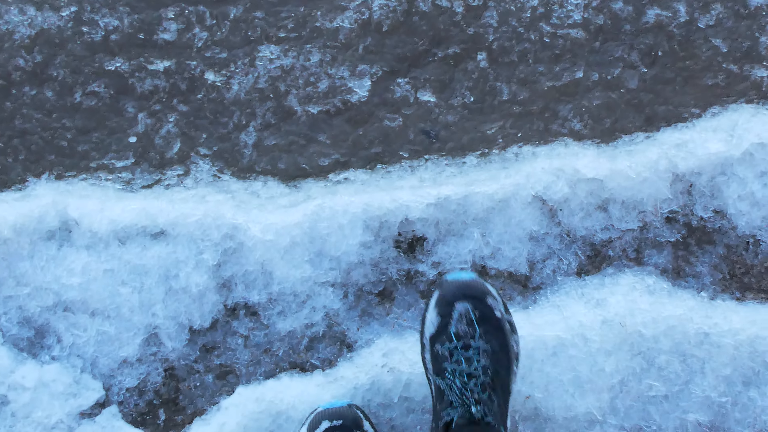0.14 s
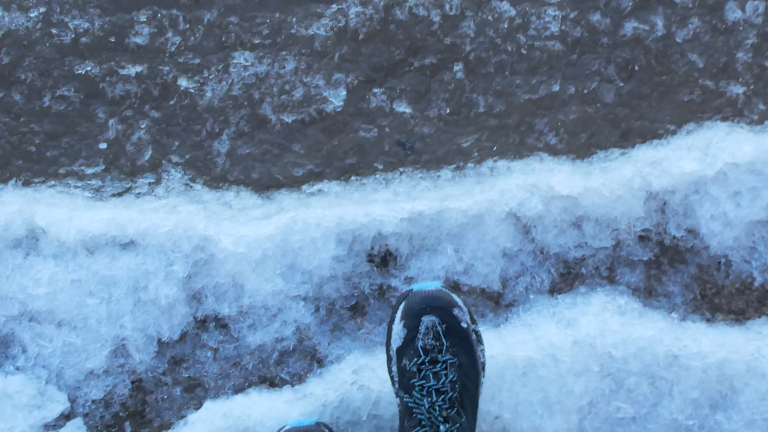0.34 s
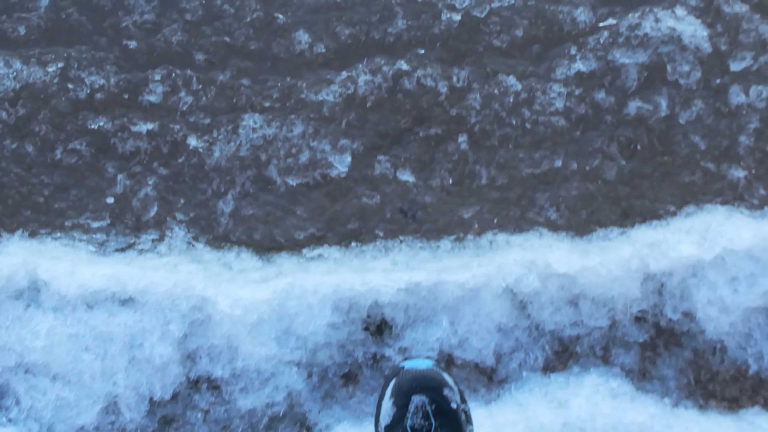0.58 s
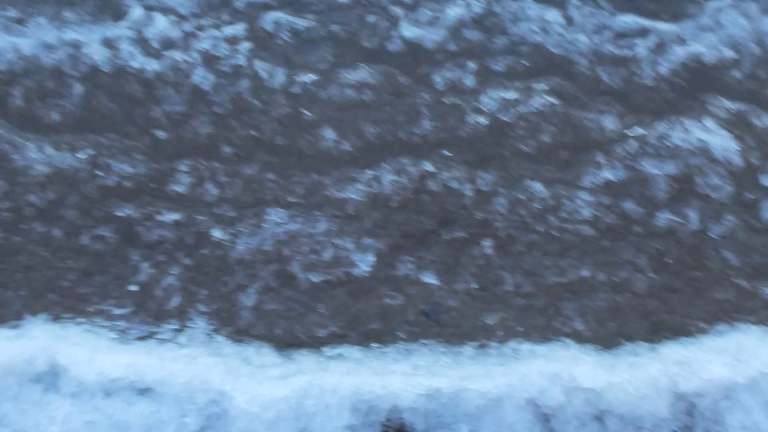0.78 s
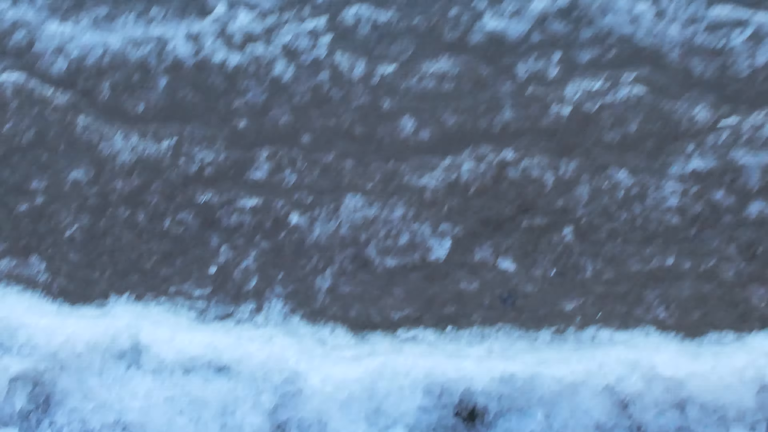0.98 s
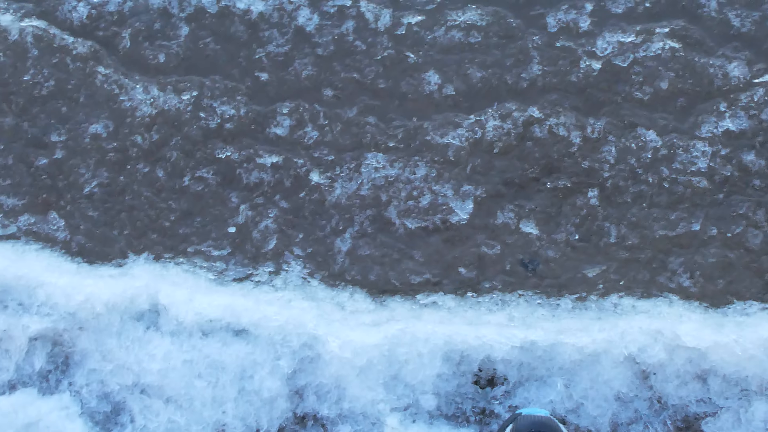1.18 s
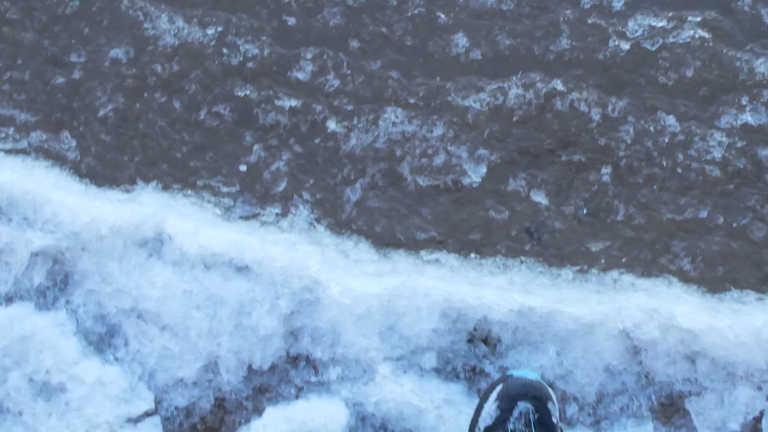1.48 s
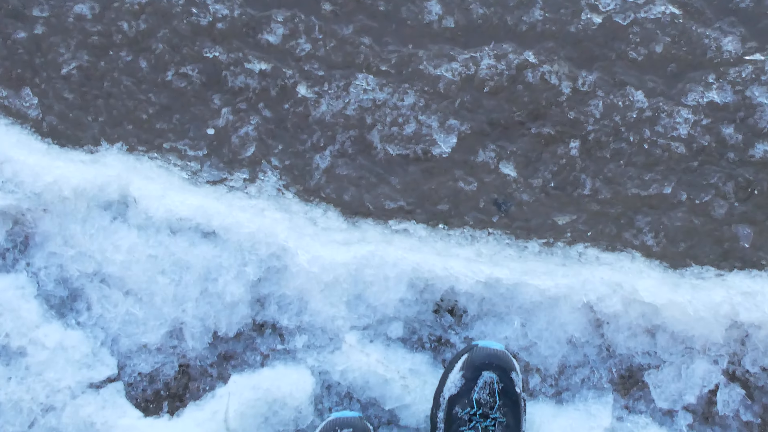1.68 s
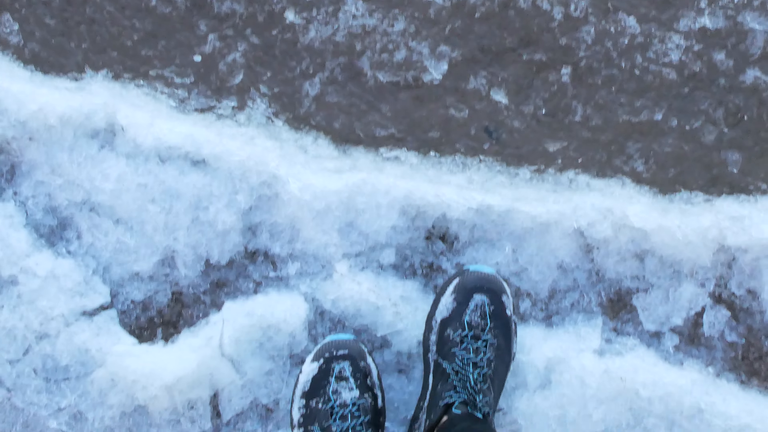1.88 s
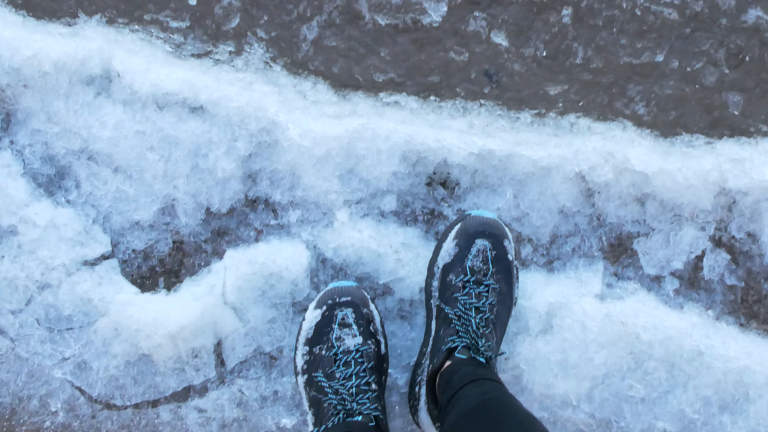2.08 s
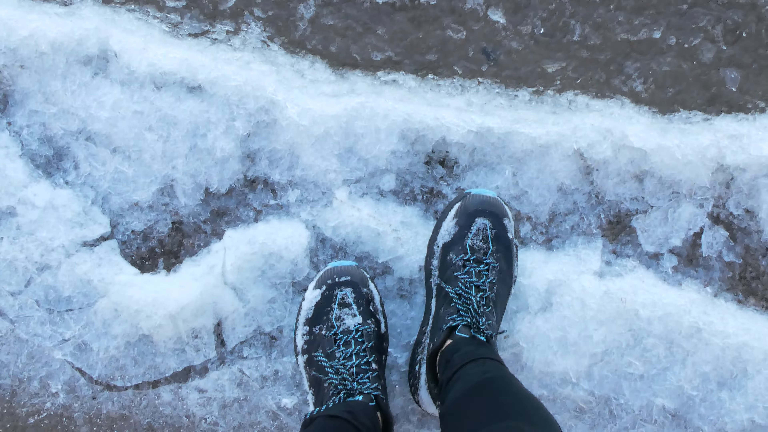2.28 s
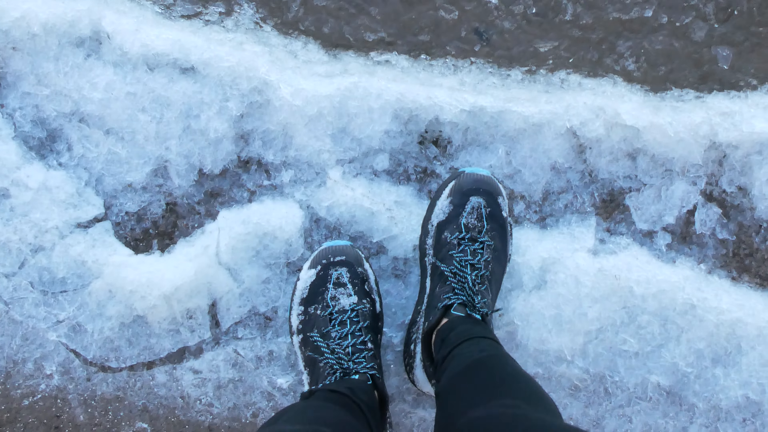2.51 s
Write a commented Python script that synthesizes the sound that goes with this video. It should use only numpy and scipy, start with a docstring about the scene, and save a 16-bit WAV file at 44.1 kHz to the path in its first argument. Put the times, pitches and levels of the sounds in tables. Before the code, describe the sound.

Shoes crunch on crusty snow and ice, close to a phone outdoors. Soft slushy water washes throughout. At 0.2 s a hollow crack and crunch break the quiet; brittle snaps cluster to 0.75 s, followed by a grinding press near 0.96 s. Fine ticks and light crunching follow around 1.1 s, separate cracks at 1.45-1.85 s, then dry crackles from 1.95 to 2.3 s, a faint low bump at 2.3 s and final snaps near 2.46 s.

```python
"""An icy shoreline: shoes shift on crusty snow just under a phone.
The crust cracks as short rings with a low thud, a treble snap and a spray of crumbs; a hollow ice shelf rings along.
Packed snow crunches as dense filtered grains, single crystals tick as thin noise bursts, and the ice adds short tones.
Behind, slushy water washes softly as flickering bands of wide noise with faint ticks; the phone bumps once, low."""
import sys
import numpy as np
from scipy import signal
from scipy.fft import rfft, irfft
from scipy.io import wavfile
from scipy.ndimage import uniform_filter1d

SR = 44100
rng = np.random.default_rng(int(sys.argv[2]) if len(sys.argv) > 2 else 0)


def unload_wav(signal):
    """Save mono or channel-first audio to the path in sys.argv[1] as 16-bit WAV at rate SR, clipped to [-1, 1]."""
    wavfile.write(
        sys.argv[1],
        SR,
        np.round(np.clip(np.atleast_2d(signal).T, -1, 1) * 32767).astype(np.int16),
    )


N = 116865  # length in samples
ATTACK_S = 0.0012  # onset of cracks and crystal ticks


def amp(db):
    """Decibels to amplitude."""
    return 10 ** (np.asarray(db) / 20)


def unit(x):
    """Scale to an RMS of 1."""
    return x / np.sqrt(np.mean(x ** 2))


def band(x, hz, width_hz):
    """Two-pole resonance, gain 1 at the centre."""
    centre_hz = min(hz, 0.4 * SR)
    return signal.lfilter(*signal.iirpeak(centre_hz, hz / width_hz, fs=SR), x)


def fade(t, t60):
    """Exponential decay that loses 60 dB in t60 seconds."""
    return np.exp(-np.log(1000) * t / t60)


def walk(rate):
    """Random levels held 1 / rate s and slewed twice."""
    hold = int(SR / rate)
    steps = np.repeat(rng.standard_normal(N // hold + 1), hold)
    return uniform_filter1d(uniform_filter1d(steps, hold), hold)[:N]


def grains(rate, scatter_db):
    """Random clicks of either sign and uneven size, rate of them a second."""
    chance, sign, size = rng.random((3, N))
    clicks = (chance < rate / SR) * np.sign(sign - 0.5)
    return unit(clicks * amp(-scatter_db * np.log(size + 0.066)))


def tones(rows):
    """Short tones that swell and sink, from rows (start_s, length_s, pitch_hz, level_db)."""
    t, out = np.arange(N) / SR, np.zeros(N)
    for start_s, length_s, pitch_hz, level_db in rows:
        swell = np.abs(np.sin(np.pi * np.clip((t - start_s) / length_s, 0, 1))) ** 0.5
        sounding = (t > start_s) * (t < start_s + length_s)
        out += amp(level_db) * swell * sounding * np.sin(2 * np.pi * pitch_hz * t)
    return out


# Cracks of the crust; thud and snap are relative to the crack, before THUD_DB and SNAP_DB:
# start_s [s], level_db [dB], ring_hz [Hz], thud_db [dB], snap_db [dB], snap_hz [Hz]
CRUST_CRACKS = [(0.2148, -6.5, 856, -13, -14.5, 6940), (0.2343, -16, 1530, -9, -16, 3980),
                (0.261, -12.5, 1570, -13.5, -14, 5700), (0.323, -19.5, 1660, -18, -3, 2380),
                (0.337, -19.5, 1610, -14, 2, 2330), (0.362, -10.5, 1630, -21, -15.5, 3170),
                (0.399, -2, 1607, -19.5, -15.5, 6100), (0.412, -13, 1660, -9, -10, 2420),
                (0.498, -14.5, 835, -13.5, -7.5, 2600), (0.546, -20.5, 2150, -13, -8, 2400),
                (0.562, -13.5, 1490, -34, -12, 2720), (0.673, -14, 1600, -40, -11.5, 2930),
                (0.693, -8.5, 1700, -24, -40, 2600), (0.733, -18.5, 1380, -2, -7, 3080),
                (0.7421, -3.5, 1990, -10, -6.5, 3850), (0.7457, -3.5, 690, -23.5, -28, 2200),
                (0.923, -15.5, 865, -5, -9, 2980), (0.961, -5.5, 780, -19.5, -25, 4260),
                (1.249, -16, 1160, -20, -4.5, 3060), (1.44, -8, 860, -16.5, -17.5, 3260),
                (1.4961, -6, 873, -19.5, -7.5, 2070), (1.581, -24, 1080, -7.5, -5.5, 2525),
                (1.677, -2, 934, -30, -19.5, 3470), (1.832, -4, 1070, -18, -16.5, 3300),
                (1.942, -13, 1350, -31, -11, 6200), (1.953, -15.5, 830, -45, -7, 4570),
                (2.014, -14.5, 860, -60, -8.5, 4000), (2.083, -13.5, 1290, -13.5, -14.5, 4950),
                (2.091, -12.5, 895, -45, -25, 5480), (2.129, -18, 1210, -35, -16, 2820),
                (2.148, -13.5, 935, -18, -14.5, 4100), (2.2022, -27, 980, -40, -7, 2830),
                (2.206, -9.5, 830, -42, -12, 3280), (2.229, -17, 940, -21, -12.5, 3220),
                (2.256, -17.5, 935, -18.5, -32, 5500), (2.445, -16.5, 930, -16, -11.5, 3270),
                (2.462, -6, 830, -14.5, -16, 2960), (2.472, -9.5, 950, -29, -22, 2920)]
RING_DB, THUD_DB, SNAP_DB, TAIL_DB = 3, 16, 15.5, -20  # the tail is relative to the snap
RING_T60_S, THUD_T60_S, SNAP_T60_S, TAIL_T60_S = 0.011, 0.0093, 0.0047, 0.038
THUD_HZ = 417
GLIDE, GLIDE_S = 1, 0.00051  # the ring starts this share sharp and drops to pitch


def cracks():
    """Breaking crust: a few cycles of ring, a low thud, a treble snap and a short spray of crumbs."""
    out, t = np.zeros(N + 2048), np.arange(2048) / SR
    noise = rng.standard_normal((len(CRUST_CRACKS), 2, 2048))
    rise = 1 - np.exp(-(t / ATTACK_S) ** 2)
    gliding_t = t + GLIDE * GLIDE_S * (1 - np.exp(-t / GLIDE_S))
    for row, (snap_noise, ring_noise) in zip(CRUST_CRACKS, noise):
        start_s, level_db, ring_hz, thud_db, snap_db, snap_hz = row
        ring = np.sin(2 * np.pi * ring_hz * gliding_t) * fade(t, RING_T60_S) * amp(RING_DB)
        rough = unit(band(ring_noise, 1.3 * ring_hz, ring_hz))
        rough = rough * fade(t, 1.4 * RING_T60_S) * amp(-6)
        thud = -np.sin(2 * np.pi * THUD_HZ * t) * fade(t, THUD_T60_S) * amp(thud_db + THUD_DB)
        narrow = unit(band(snap_noise, snap_hz, 0.068 * snap_hz))
        broad = unit(band(snap_noise, snap_hz, 2 * snap_hz))
        hiss = unit(narrow + 1.7 * broad + 0.5 * snap_noise)
        snap_and_crumbs = fade(t, SNAP_T60_S) + amp(TAIL_DB) * fade(t, TAIL_T60_S)
        snap = hiss * snap_and_crumbs * amp(snap_db + SNAP_DB)
        out[int(start_s * SR):][:2048] += amp(level_db) * rise * (ring + rough + thud + snap)
    return out[:N]


# Centres of the treble bands, one a crystal size: pitch_hz [Hz]
CRYSTAL_SIZES = [2700, 3960, 6470, 9700, 14200]
GRAINS_PER_S, GRAIN_SCATTER_DB = 1400, 4


def crystal_treble(body_grains):
    """Crystals of several sizes: grains open noise in resonant bands, the higher the shorter."""
    treble = 0
    for hz in CRYSTAL_SIZES:
        energy = body_grains ** 2 + grains(250, GRAIN_SCATTER_DB) ** 2
        # the energy decays with a time constant of three cycles
        energy = signal.lfilter([1], [1, -np.exp(-hz / (3 * SR))], energy)
        spray = unit(energy ** 0.5) + 0.25
        crystals = unit(band(spray * rng.standard_normal(N), hz, hz / 2))
        treble = treble + amp(2.9 * walk(70.03)) * crystals
    return unit(treble)


# Weight crushing snow, one row a press:
# start_s [s], rise_s [s], hold_s [s], fall_s [s], body_db [dB], treble_db [dB], body_hz [Hz]
SNOW_PRESSES = [(0.212, 0.0042, 0.018, 0.042, -22.5, -25, 1460),
                (0.333, 0.027, 0.062, 0.017, -36, -37, 1760), (0.531, 0.011, 0.02, 0.0073, -29, -38, 1680),
                (0.703, 0.028, 0.015, 0.007, -29.5, -25, 1330),
                (0.747, 0.0044, 0.028, 0.063, -31, -29, 830), (0.83, 0.015, 0.028, 0.027, -29.5, -30, 654),
                (0.891, 0.02, 0.058, 0.016, -32.5, -29.5, 940),
                (0.963, 0.0036, 0.023, 0.11, -26, -25.5, 940),
                (1.119, 0.08, 0.073, 0.015, -31.5, -28.5, 790),
                (1.281, 0.006, 0.023, 0.0078, -37, -40, 890), (1.346, 0.034, 0.07, 0.067, -38.5, -39, 1070),
                (1.803, 0.011, 0.026, 0.013, -28.5, -25.5, 960),
                (2.206, 0.0098, 0.039, 0.02, -41.5, -40.5, 940),
                (2.269, 0.0072, 0.011, 0.041, -35, -33.5, 910)]
FADE_DB = 18  # a press rises from and falls to this far under its level
BODY_SHARPNESS = 0.76  # centre over width of each body resonance


def crunch():
    """Packed snow: crystals break in dense uneven bursts while the sole presses."""
    t, out = np.arange(N) / SR, np.zeros(N)
    body_grains = grains(GRAINS_PER_S, GRAIN_SCATTER_DB) * amp(2.63 * walk(120))
    treble = crystal_treble(body_grains)
    for start_s, rise_s, hold_s, fall_s, body_db, treble_db, body_hz in SNOW_PRESSES:
        edges = start_s + np.cumsum([0, rise_s, hold_s, fall_s])
        pressure = amp(np.interp(t, edges, [-FADE_DB, 0, 0, -FADE_DB]))
        pressure = pressure * (t > start_s) * (t < edges[-1])
        width_hz = body_hz / BODY_SHARPNESS
        body = unit(band(band(body_grains, body_hz, width_hz), body_hz, width_hz))
        out += pressure * (amp(body_db) * body + amp(treble_db) * treble)
    return out


# Single crystals snapping: start_s [s], level_db [dB, before doubling], pitch_hz [Hz]
CRYSTAL_TICKS = [(.311, -28, 2590), (0.597, -23.5, 6870), (0.667, -20, 1730), (1.05, -26, 11500),
                 (1.07, -27, 9500), (1.08, -25.5, 8500), (1.116, -27, 10200), (1.142, -28, 8720),
                 (1.175, -17, 3280), (1.2, -17.5, 2850), (1.409, -19, 1290), (1.741, -21, 1480),
                 (1.871, -23.5, 1740), (1.99, -23.5, 1290), (1.77, -17.5, 4500), (1.794, -20.5, 7500)]
TICK_T60_S, TICK_WIDTH = 0.0097, 0.71  # width as a share of the pitch


def ticks():
    """Single crystals: each snap is a thin noise burst around one pitch."""
    out, t = np.zeros(N + 1024), np.arange(1024) / SR
    envelope = (1 - np.exp(-t / ATTACK_S)) * fade(t, TICK_T60_S)
    noise = rng.standard_normal((len(CRYSTAL_TICKS), 1024))
    for (start_s, level_db, pitch_hz), burst in zip(CRYSTAL_TICKS, noise):
        burst = unit(band(burst, pitch_hz, TICK_WIDTH * pitch_hz))
        out[int(start_s * SR):][:1024] += 2 * amp(level_db) * burst * envelope
    return out[:N]


# Modes of the hollow ice: pitch_hz [Hz], t60_s [s], level_db [dB, before SHELF_DB]
SHELF_MODES = [(430, 0.053, -3.5), (1537, 0.023, -4)]
SHELF_UNTIL_S, SHELF_DB = 0.86, 5.5  # the foot is on the shelf until then


def shelf(feet):
    """The hollow shelf, driven only while the foot is on it, rings at its own modes."""
    push = feet * (np.arange(N) < SHELF_UNTIL_S * SR)
    ringing = np.zeros(N)
    for pitch_hz, t60_s, level_db in SHELF_MODES:
        width_hz = np.log(1000) / np.pi / t60_s
        ringing += amp(level_db) * band(push, pitch_hz, width_hz)
    return amp(SHELF_DB) * ringing


# Short tones of the ice: start_s [s], length_s [s], pitch_hz [Hz], level_db [dB]
ICE_TONES = [(.216, 0.033, 425, -23), (.272, 0.02, 430, -31.5), (.345, 0.032, 3317, -31.5),
             (.417, 0.018, 430, -29.5), (.995, .045, 915, -33), (1.478, .007, 11100, -31)]


def ice_tones():
    """Short tones of the ice: low hollow rings near 430 Hz, a scrape's tail, high squeaks."""
    return tones(ICE_TONES)


# Bumps of the hand-held phone: start_s [s], pitch_hz [Hz], level_db [dB]
PHONE_BUMPS = [(2.315, 101.7, -37.5)]
BUMP_S = 0.028


def bumps():
    """The hand-held phone bumps softly: a short low tone."""
    return tones([(start_s, BUMP_S, hz, db) for start_s, hz, db in PHONE_BUMPS])


def crumbs():
    """Slush and ice crumbs: faint random clicks through a broad resonance."""
    return unit(band(grains(350, 7.1), 1070, 2200)) * amp(-48)


# Colour of the water, relative: pitch_hz [Hz], level_db [dB per Hz]
WASH_COLOUR = [(15, -53), (25, -20.5), (335, -5.5), (439, -9), (734, -7.5), (911, -8), (10100, -13.5),
               (16000, -24.5)]
# Loudness of the water: time_s [s], level_db [dB]
WASH_LOUDNESS = [(.1, -39), (.46, -41.5), (.62, -38), (1.5, -41.5), (2.35, -39)]


def wash():
    """Slushy water: coloured noise in overlapping octave-spaced bands that flicker, wide in stereo."""
    colour_table, loudness = np.array(WASH_COLOUR), np.array(WASH_LOUDNESS)
    f = np.maximum(np.fft.rfftfreq(N, 1 / SR), 1)
    colour = amp(np.interp(np.log(f), np.log(colour_table[:, 0]), colour_table[:, 1]))
    mid_spectrum, side_spectrum = (rfft(rng.standard_normal(N)) * colour for _ in range(2))
    water = 0
    for octave in range(-1, 10):
        share = np.clip(1 - abs(np.log2(f / 31.25) - octave), 0, 1)
        mid, side = irfft(mid_spectrum * share, N), irfft(side_spectrum * share, N)
        width = amp(max(8 - 2.84 * octave, -4))  # widest in the bass
        water = water + amp(2.13 * walk(11.81)) * (mid + width * side * np.array([[1], [-1]]))
    level_db = np.interp(np.arange(N) / SR, loudness[:, 0], loudness[:, 1])
    return unit(water) * amp(level_db)


FEET_LOW_HZ, SOFT_TOP_HZ = 197, 13200  # band of the cracks and crunch
# the left microphone picks up the feet's lows more strongly, below this pitch
LEFT_LOW_DB, LEFT_LOW_HZ = 6, 2310
SPREAD_DB, SPREAD_RATE = -9.5, 330  # how far, and how often a second, the breaking spot jumps


def scene():
    """The left microphone hears more of the feet's lows; the breaking spot jumps about, over bumps and water."""
    feet_band = signal.butter(2, [FEET_LOW_HZ, SOFT_TOP_HZ], "band", fs=SR, output="sos")
    feet = signal.sosfilt(feet_band, cracks() + crunch()) + ticks()
    feet = feet + shelf(feet) + ice_tones()
    low = signal.lfilter(*signal.butter(2, LEFT_LOW_HZ, fs=SR), feet)
    left_low = np.tanh(np.log(amp(LEFT_LOW_DB)) / 2) * low
    jumps = amp(SPREAD_DB) * walk(SPREAD_RATE) * (feet - 0.36 * low)
    side = left_low + jumps
    bump = bumps()
    return np.array([feet + side + bump, feet - side + 0.48 * bump]) + wash() + crumbs()


GAIN_S, GAIN_KNEE_DB = 0.14, -27  # averaging time and knee of the turning down
GAIN_SLOPE = 0.225  # dB turned down per dB, well above the knee
TOP_HZ = 15900


def record(dry):
    """The phone thins the bass, turns down after loud moments, rounds the peaks and cuts the top."""
    x = signal.sosfilt(signal.butter(2, 90, "high", fs=SR, output="sos"), dry)
    keep = np.exp(-1 / (GAIN_S * SR))
    loud = signal.lfilter([1 - keep], [1, -keep], np.mean(x ** 2, axis=0)) ** 0.5
    gain = (1 + (loud / amp(GAIN_KNEE_DB)) ** 2) ** (-GAIN_SLOPE / 2)
    rounded = np.tanh(x * gain)
    return signal.sosfilt(signal.ellip(10, 0.2, 80, TOP_HZ, fs=SR, output="sos"), rounded)


dry = scene()
out = record(dry)
unload_wav(out)
```